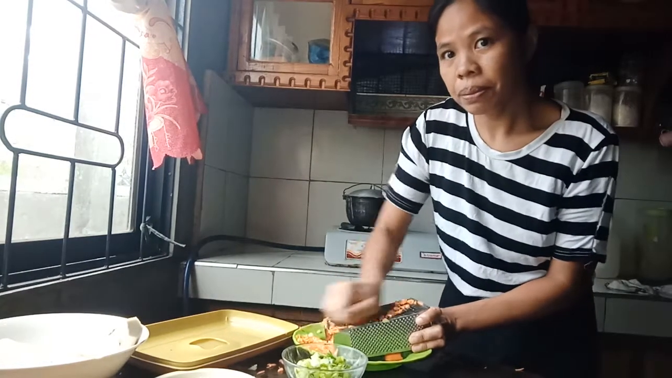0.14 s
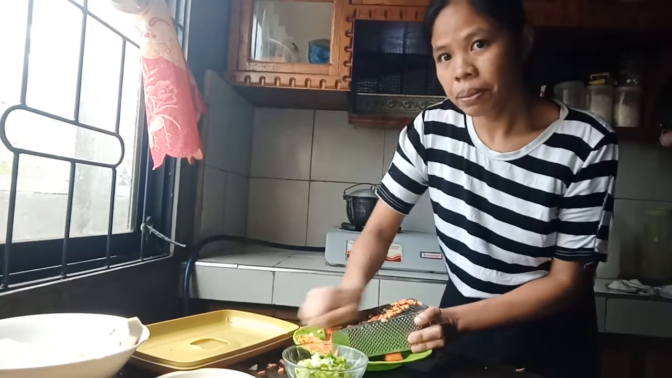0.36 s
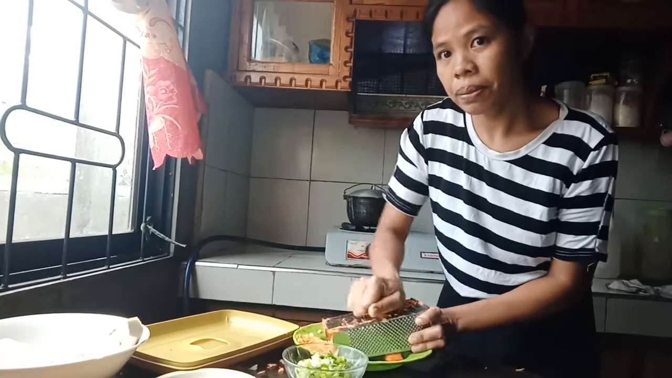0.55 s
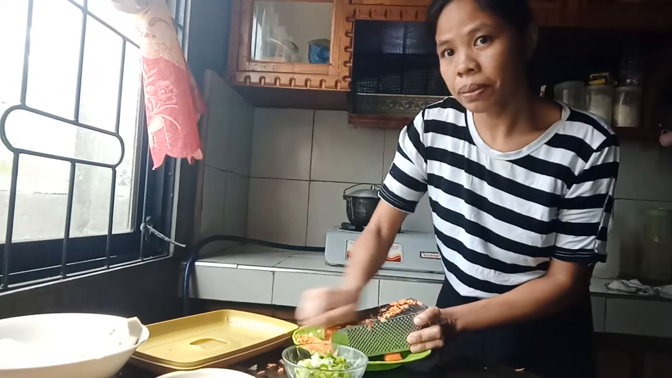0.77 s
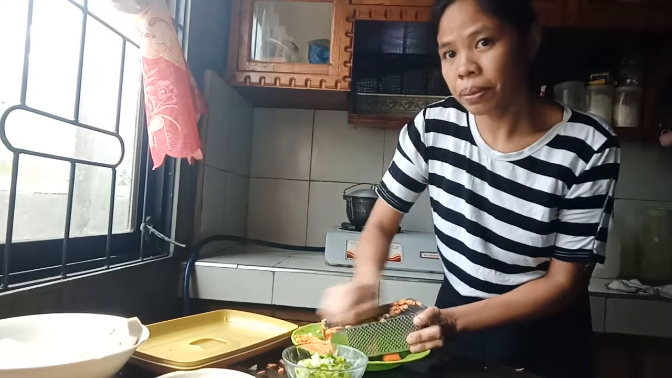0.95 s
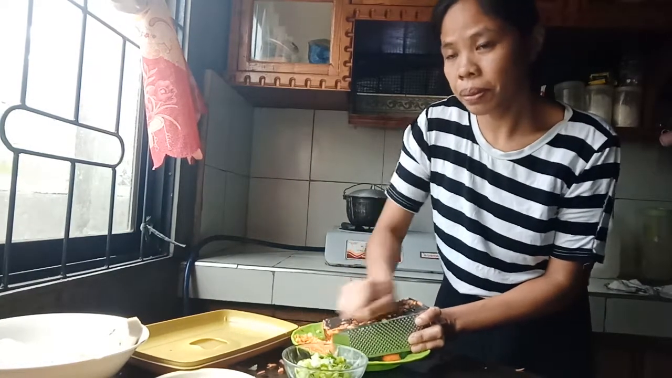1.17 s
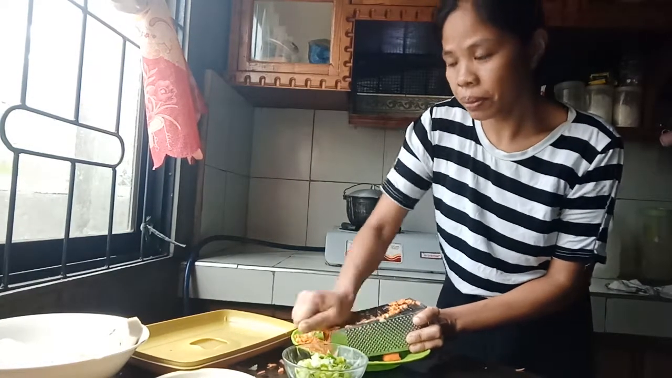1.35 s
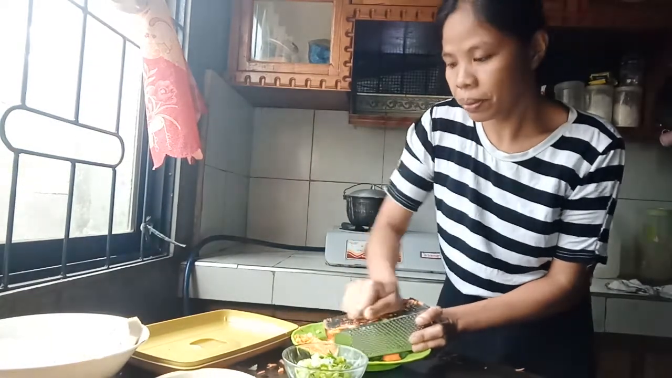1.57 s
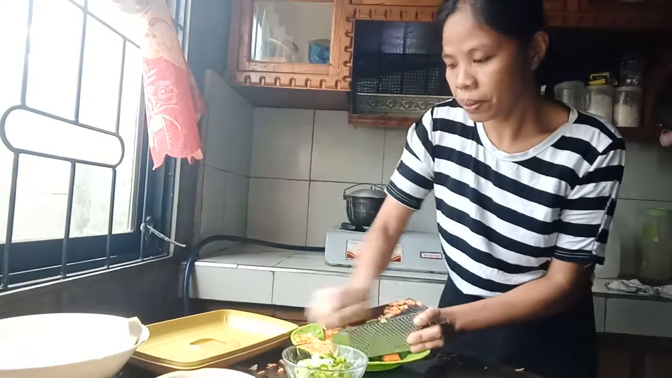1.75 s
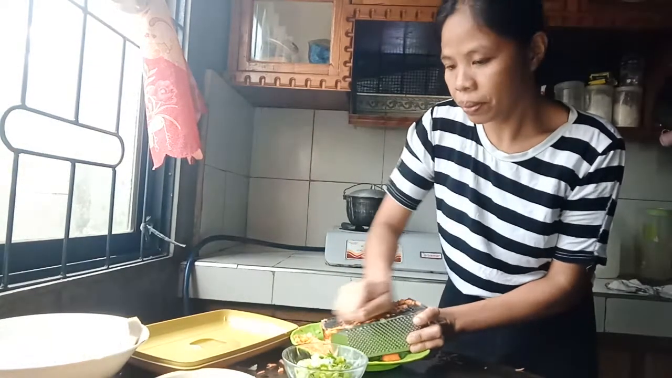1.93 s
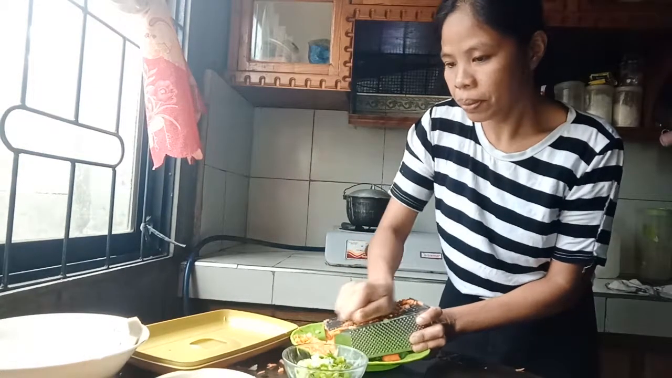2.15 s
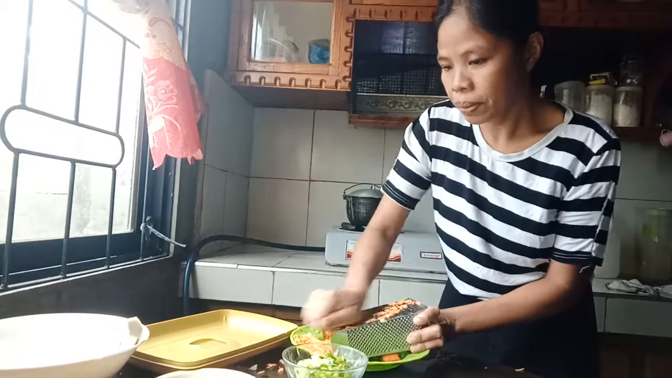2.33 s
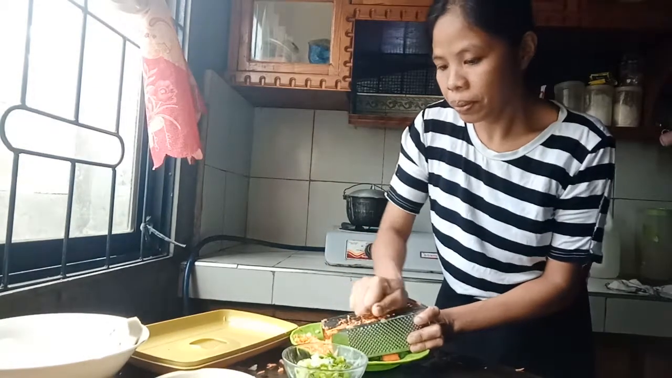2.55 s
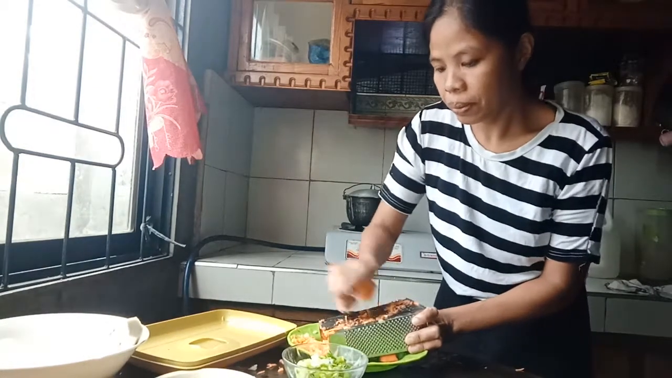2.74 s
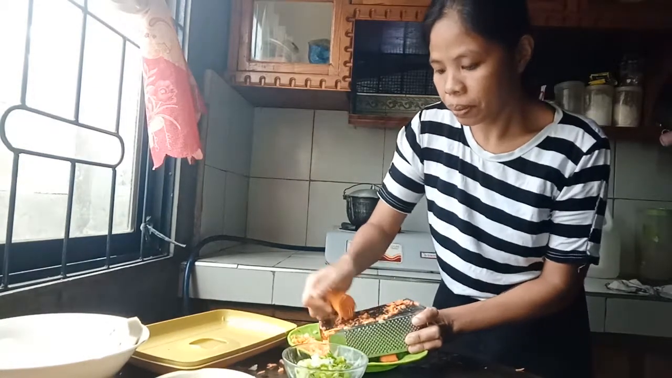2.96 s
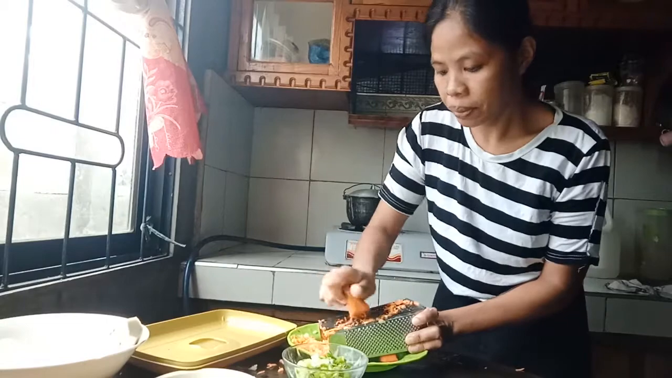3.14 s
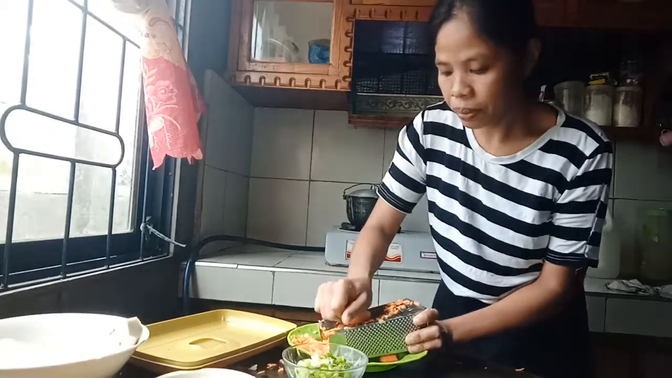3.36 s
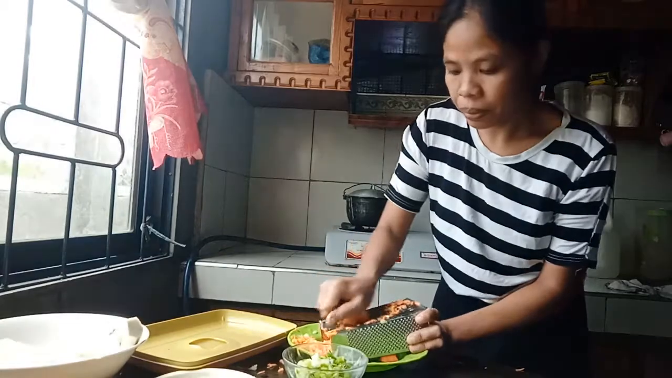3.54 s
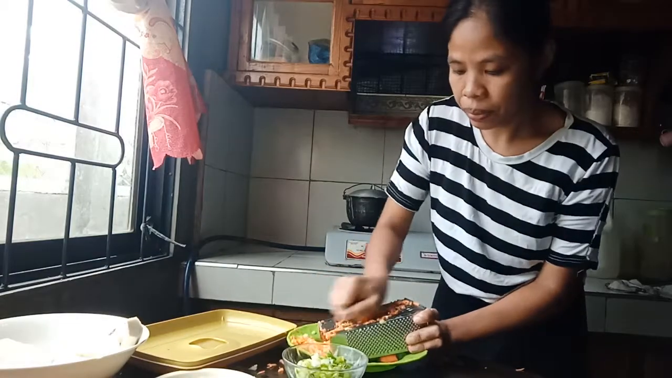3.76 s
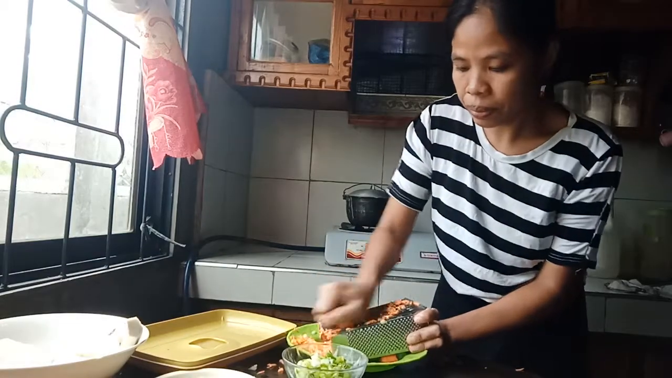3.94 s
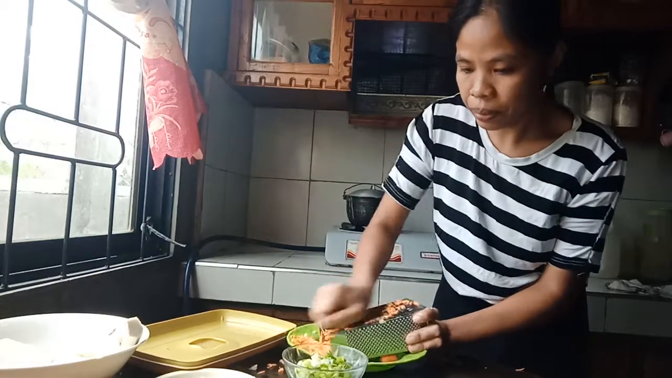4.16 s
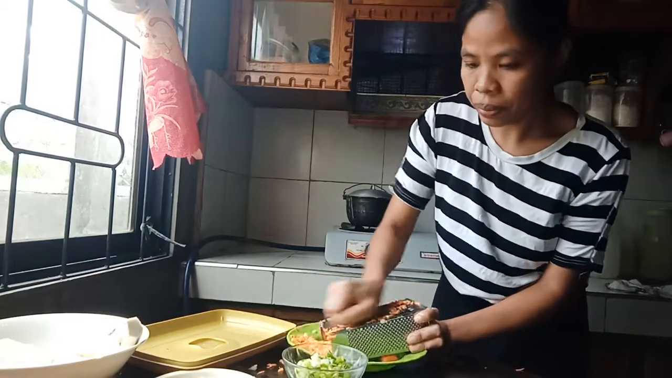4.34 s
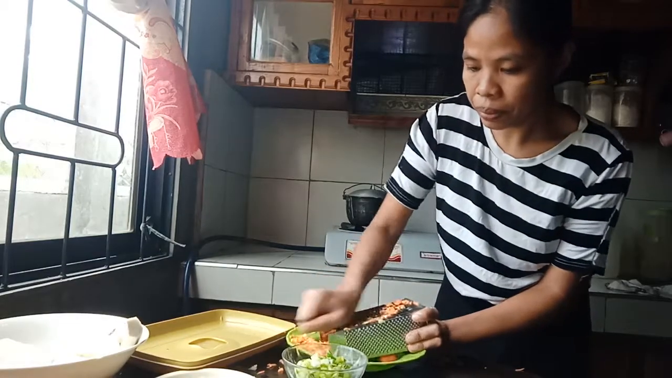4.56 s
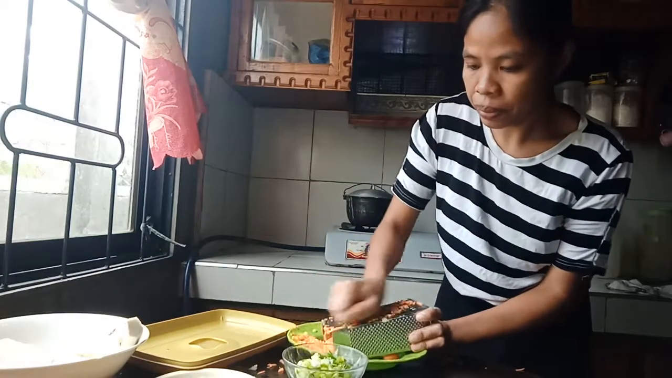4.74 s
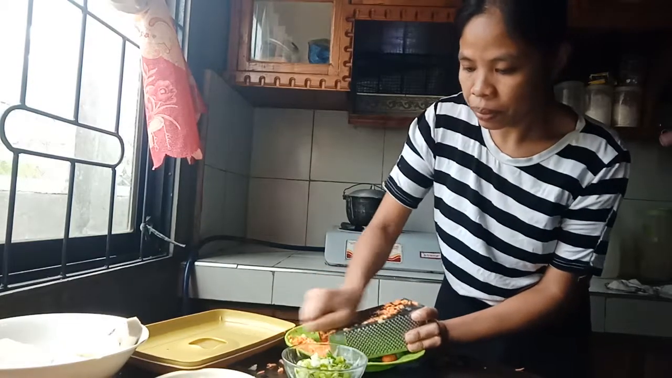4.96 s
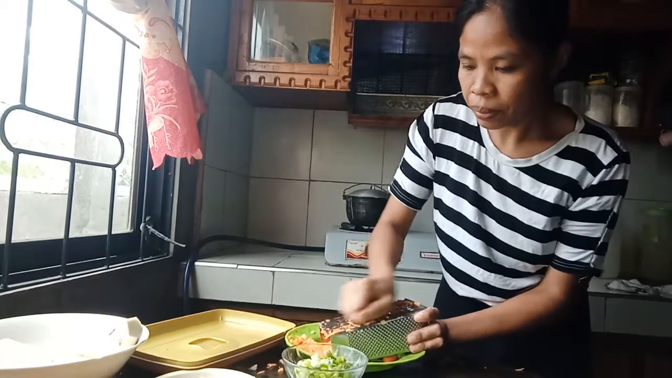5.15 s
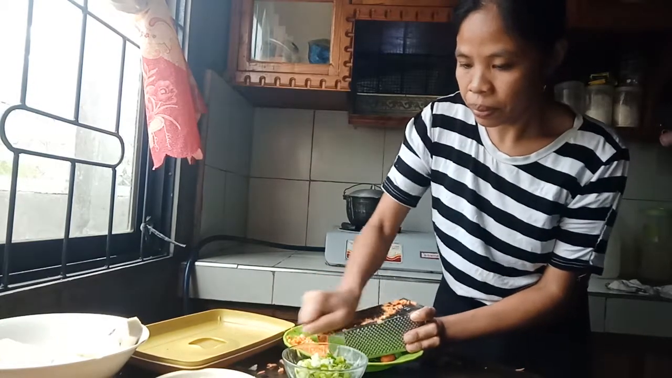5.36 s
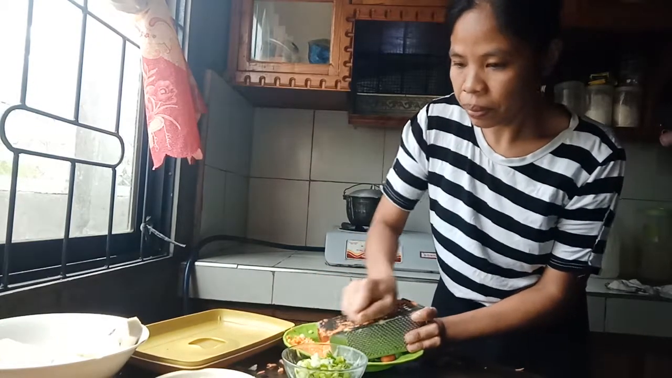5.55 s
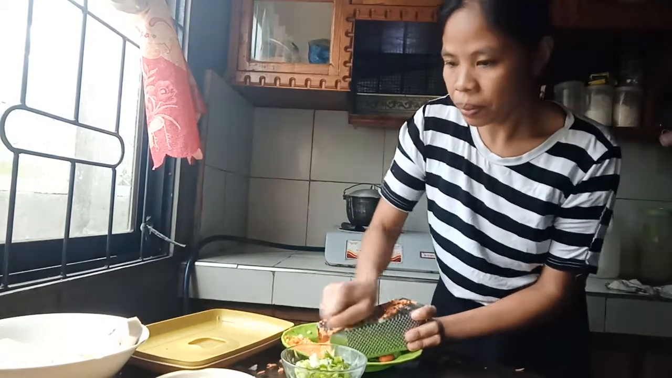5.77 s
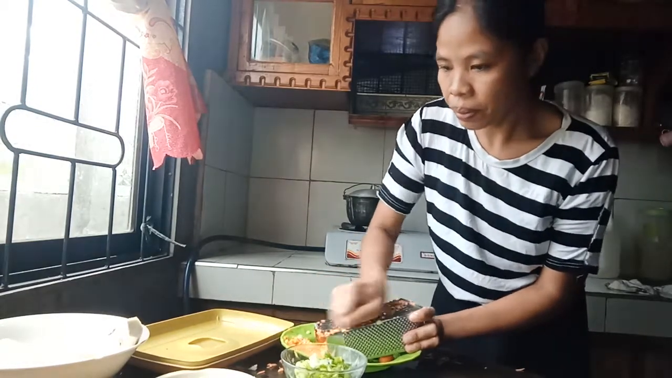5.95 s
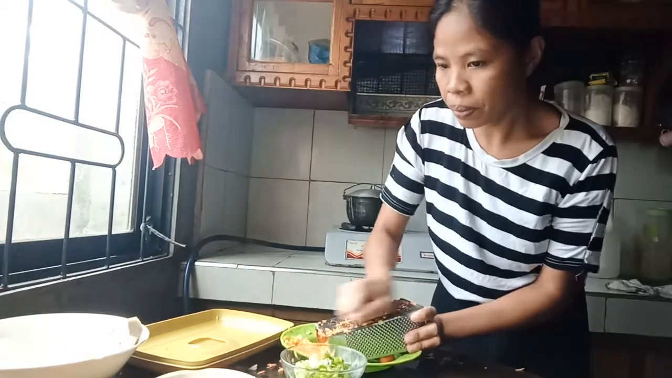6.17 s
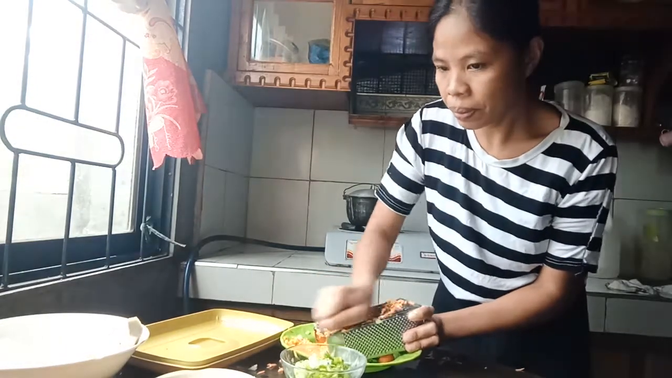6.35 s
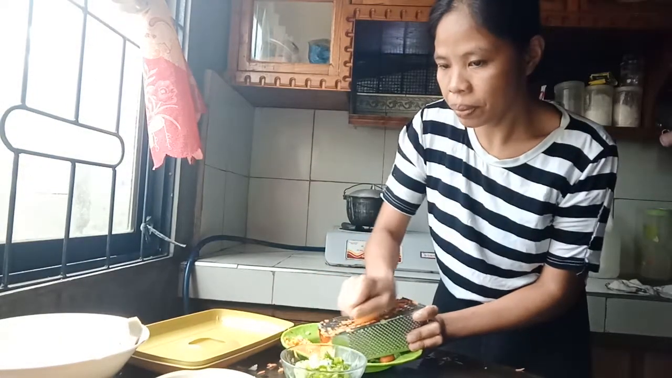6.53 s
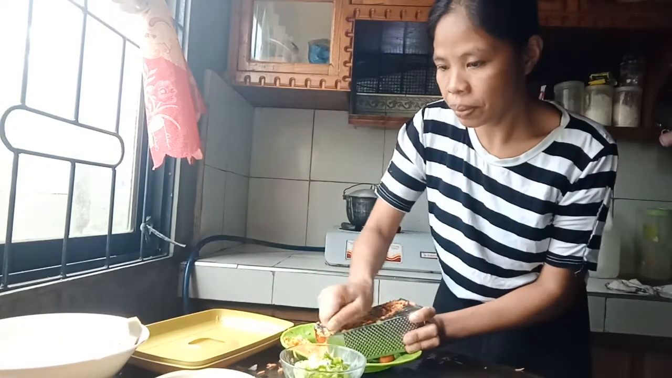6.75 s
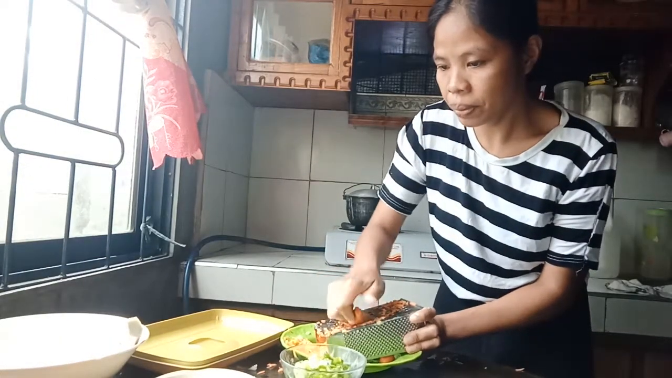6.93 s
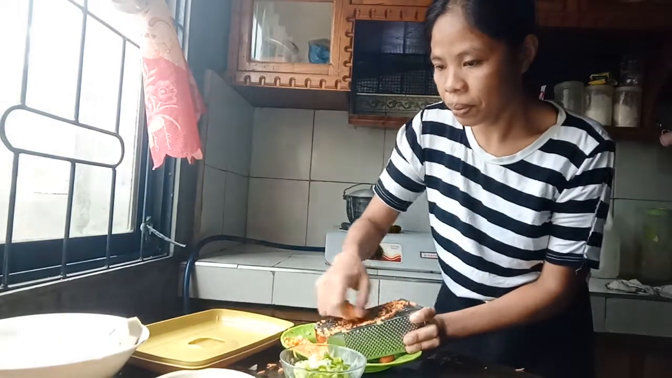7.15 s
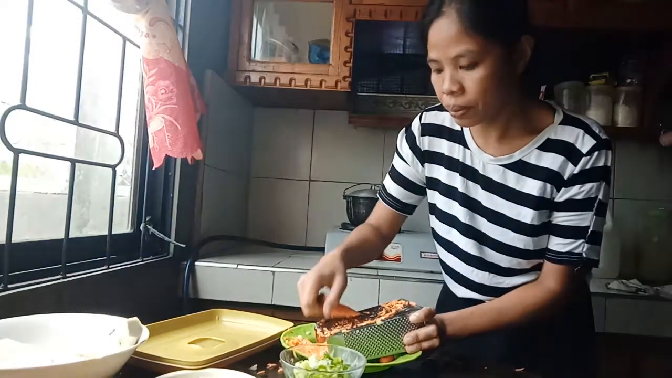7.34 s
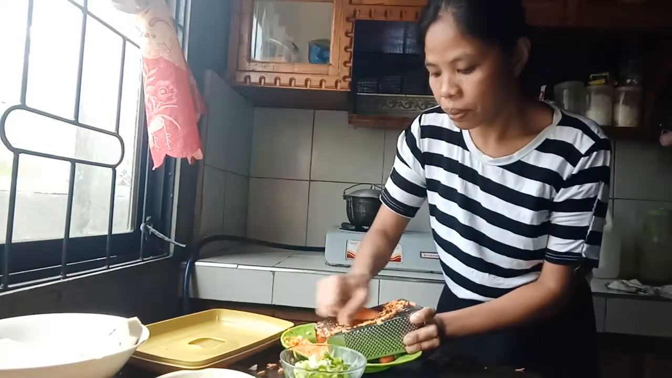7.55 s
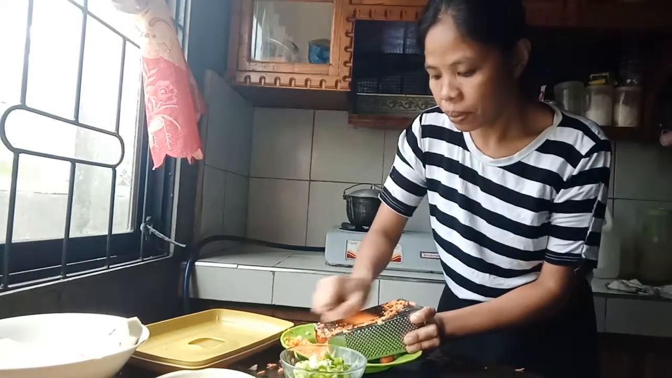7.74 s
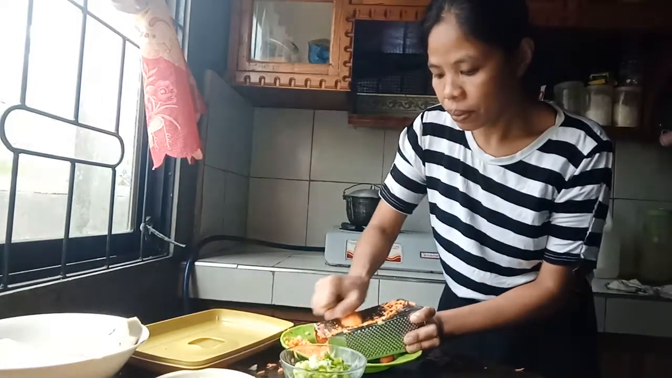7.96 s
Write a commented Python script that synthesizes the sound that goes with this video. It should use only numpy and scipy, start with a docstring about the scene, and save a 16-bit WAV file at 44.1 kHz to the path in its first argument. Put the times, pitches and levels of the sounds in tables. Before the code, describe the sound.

In a tiled kitchen with light reverberation, steel teeth rasp through a carrot in even, nearby strokes, with soft taps at some turns. The work breaks off for a moment, then goes on with sharp clacks of the grater against a ringing plate and one tiny wet squeak. After another pause come faint strokes and a brief scrape of the plate across the table. A cricket chirps very faintly far away.

```python
"""A carrot is grated by hand, to and fro, on a grater resting on a plate in a tiled kitchen.
The steel teeth snap off wet shreds, the carrot taps dully at some turns, and a cricket chirps far off.
After a pause for a new grip the strokes get harder: the grater knocks the plate into ringing,
and the wet carrot squeaks once. The work stops again, and as it resumes the plate sticks and slips,
juddering briefly across the table."""
import sys
import numpy as np
from scipy import signal
from scipy.fft import rfft, irfft
from scipy.io import wavfile
from scipy.ndimage import uniform_filter1d

SR = 44100
rng = np.random.default_rng(int(sys.argv[2]) if len(sys.argv) > 2 else 0)


def unload_wav(signal):
    """Save mono or channel-first audio to the path in sys.argv[1] as 16-bit WAV at rate SR, clipped to [-1, 1]."""
    wavfile.write(
        sys.argv[1],
        SR,
        np.round(np.clip(np.atleast_2d(signal).T, -1, 1) * 32767).astype(np.int16),
    )


N = 352800

# tone of a hard contact, for taps and knocks: f/Hz, level/dB
CONTACT_SPECTRUM = [(40, -32.5), (120, -13), (215, -2), (320, -4.5), (650, 0), (1000, 1), (1650, -0.5),
                    (2100, -1), (3100, -7.5), (4100, -7.5), (5300, -27), (6200, -20.5), (7500, -42),
                    (15500, -44.5)]


def from_db(db):
    """Decibels to gain."""
    return 10 ** (np.asarray(db) / 20)


def unit_rms(x):
    """Scale to unit power."""
    return x / np.sqrt(np.mean(x ** 2) + 1e-20)


def at_hz(points, hz):
    """Read a table on a log-frequency axis."""
    f, value = np.transpose(points)
    return np.interp(np.log(np.maximum(hz, 1)), np.log(f), value)


def add(out, s, sound):
    """Mix a sound in at time s."""
    at = round(s * SR)
    sound, at = sound[max(-at, 0):], max(at, 0)
    out[at:at + len(sound)] += sound[:N - at]


def colour(x, spectrum, size=4096):
    """Minimum-phase EQ with the given curve and unit power gain."""
    gain = from_db(at_hz(spectrum, np.arange(size // 2 + 1) * SR / size))
    cepstrum = irfft(np.log(gain))
    response = irfft(np.exp(rfft(2 * cepstrum[:size // 2], size)))
    return signal.fftconvolve(x, response / np.linalg.norm(response))[:len(x)]


def resonate(x, hz, width_hz):
    """Two-pole resonance with unity gain at its peak."""
    r = np.exp(-np.pi * width_hz / SR)
    feedback = [1, -2 * r * np.cos(2 * np.pi * hz / SR), r * r]
    return signal.lfilter(np.array([1, 0, -1]) * (1 - r * r) / 2, feedback, x + 1e-18)


def drift(rate):
    """Smooth random modulation of unit power, changing about rate times a second."""
    return unit_rms(np.interp(np.arange(N) * rate / SR, np.arange(N), rng.standard_normal(N)))


def room_tone(air_db=-61, drone_hz=121, drone_width_hz=9, drone_db=-67, swell_db=2):
    """Quiet room air with a low drone that swells and fades."""
    # tone of the air: f/Hz, level/dB
    air_spectrum = [(15, -83.5), (25, -40.5), (91, -15), (122, -1), (148, -18.5), (240, -18), (267, -20.5),
                    (421, -21), (495, -26), (1270, -29.5), (1530, -25.5), (1750, -35), (2360, -27),
                    (5580, -46), (15500, -52.5)]
    air = from_db(air_db) * colour(rng.standard_normal(N), air_spectrum)
    drone = resonate(rng.standard_normal(N), drone_hz, drone_width_hz)
    drone = unit_rms(resonate(drone, drone_hz, 2 * drone_width_hz))
    return air + from_db(drone_db + swell_db * drift(2.9)) * drone


def strokes():
    """The hand swings evenly, a push and a return each cycle; yields start/s, length/s, level/dB."""
    # runs of strokes: start/s, stop/s, cycle/s, push length/s,
    # return offset/s, return length/s, return against push/dB
    runs = [(-.219, 2.5, 0.33, .16, 0.19, .11, -5.5), (3.161, 4.93, .376, 0.14, .195, 0.12, 4.5),
            (5.024, 6.72, 0.3525, 0.21, .225, .085, -2), (7.541, 7.74, 0.38, 0.11, 0.16, 0.16, -1.5)]
    # how hard the carrot is pressed on the teeth: t/s, relative level/dB
    pressure = [(0, -29.5), (.18, -35.5), (.5, -33), (.85, -34), (1.3, -35.5), (2.5, -36), (3.25, -68.5),
                (3.42, -66.5), (3.62, -39), (4.1, -34), (4.95, -32.5), (5.4, -36.5), (5.85, -33.5),
                (6.2, -38), (6.53, -41.5), (6.7, -49.5), (7.58, -57), (7.78, -45.5)]
    for first, stop, cycle, push_s, turn_s, return_s, return_db in runs:
        for push in np.arange(first, stop, cycle):
            for start, length, lift_db in ((push, push_s, 0), (push + turn_s, return_s, return_db)):
                if start < min(stop, N / SR):
                    yield start, length, lift_db + np.interp(start + length / 2, *np.transpose(pressure))


def grating(snaps_per_s=4500, spread_db=2.5, chatter_db=1.24, rows_per_s=220, juice_db=-6,
            sheet_db=-1, sheet_width_hz=130, sheet_shift_db=4, sheet_parts=9, skew=.85):
    """Teeth tear off shreds in tiny snaps, more of them the faster the carrot moves, over a wet hiss."""
    # tone of the rasp: f/Hz, level/dB
    rasp_spectrum = [(30, -44.5), (60, -13.5), (200, -4), (330, -6), (430, -2), (640, 0), (950, -2),
                     (1250, -1), (1900, -6), (2600, -2), (4450, -9), (5260, -22), (6230, -19),
                     (9800, -39.5), (15500, -37.5)]
    speed, force = np.zeros(N), np.zeros(N)
    for start, length, level_db in strokes():
        travel = np.linspace(0, 1, int(length * SR)) ** skew  # full speed early, then a slow ease-off
        arc = np.sin(np.pi * travel).clip(0) ** 1.1
        add(speed, start, arc)
        add(force, start, from_db(level_db) * np.sqrt(arc))
    chance = snaps_per_s / SR
    sizes = from_db(spread_db * np.minimum(rng.exponential(1, N), 4))
    sizes = unit_rms(sizes * rng.choice([-1, 1], N))
    snaps = sizes * (rng.random(N) < chance * speed) / np.sqrt(chance)
    juice = from_db(juice_db) * np.sqrt(speed) * rng.standard_normal(N)
    catching = from_db(chatter_db * drift(rows_per_s))  # rows of teeth catch and let go
    # each snap plucks one part of the steel sheet; which parts speak shifts as the carrot travels
    part = rng.integers(0, sheet_parts, N)
    sheet = np.zeros(N)
    for k, hz in enumerate(np.geomspace(2250, 4250, sheet_parts)):
        ring = resonate(snaps * (part == k), hz, sheet_width_hz)
        sheet += ring * from_db(sheet_db + sheet_shift_db * drift(17))
    return colour((snaps + juice + sheet) * force * catching, rasp_spectrum)


def carrot_taps(ring_t60=.023, grit_t60=0.05, grit_db=-10, soft_hz=2400):
    """Set down at a turn, the carrot bumps one well-damped resonance, with a little contact grit."""
    # light, dull taps: t/s, level/dB, f/Hz
    taps = [(.030, -25.5, 620), (0.269, -25, 1273), (0.383, -20, 660), (0.466, -29.5, 1300),
            (1.006, -23.5, 645.7), (1.528, -30, 729.2), (1.604, -29.5, 1350), (1.917, -27.5, 672.8),
            (2.263, -26, 815), (3.699, -25.5, 900), (6.31, -32, 970), (6.750, -25, 890)]
    t, out = np.arange(SR // 10) / SR, np.zeros(N)
    for s, level_db, hz in taps:
        bump = np.sin(2 * np.pi * hz * t) * from_db(-60 * t / ring_t60)
        grit = rng.standard_normal(len(t)) * from_db(grit_db - 60 * t / grit_t60)
        add(out, s, from_db(level_db) * (bump + colour(grit, CONTACT_SPECTRUM)))
    return signal.lfilter(*signal.butter(2, soft_hz, fs=SR), out)


def cricket(first_s=0.05, period_s=0.1326, jitter_s=0.0044, spacing_s=.018, syllable_s=.013,
            start_hz=6950, end_hz=6480, level_db=-76):
    """A far cricket: two wing strokes a chirp, each a short falling whistle."""
    out, size = np.zeros(N), int(syllable_s * SR)
    glide_hz = np.linspace(start_hz, end_hz, size)
    syllable = np.hanning(size) * np.sin(2 * np.pi * np.cumsum(glide_hz) / SR)
    for k, (late, loud) in enumerate(rng.standard_normal((int(N / SR / period_s), 2))):
        onset = first_s + k * period_s + jitter_s * late
        for stroke in range(2):
            add(out, onset + stroke * spacing_s, from_db(level_db + 2 * loud) * syllable)
    return out


def grater_knocks(ring_db=-1, focus_db_per_octave=7, rise_share=.16, shiver=0.025, ring_send_db=-2.5,
                  strike_db=-10, soft_hz=5600, strike_hz=3800):
    """The grater lands in a short rattle that rings the plate; returns direct sound and reverb send."""
    # grater on plate: t/s, level/dB, rattle length/s, ring/dB, ring focus/Hz, reverb send/dB
    knocks = [(3.511, -40, 0.021, -17, 2400, -5), (3.733, -9, 0.014, 3.5, 950, .5),
              (4.033, -24.5, .009, -12.5, 787, -1), (4.060, -13.5, 0.0071, -15, 1400, -11),
              (4.093, -7, .011, 4, 834, 1), (4.460, -8.5, 0.019, 7.5, 780, 0),
              (4.872, -11, .019, 6.5, 788.2, -0.5), (5.113, -21.5, 0.0072, 8, 1690, -2),
              (5.213, -17, 0.013, 5.5, 803, -6.5), (5.278, -26, .01, 1.5, 3400, -5.5),
              (5.412, -26, .007, -19.5, 2400, 2), (5.548, -8, 0.016, -2, 1200, -0.5),
              (5.609, -9, .0066, -2.5, 1397, -18), (5.892, -10, 0.0082, -3, 2060, -1.5),
              (6.157, -27, 0.0064, 0, 1850, 0), (6.560, -25, 0.0071, 0, 1660, -2),
              (7.842, -40, 0.0065, -16, 2400, -2.5)]
    # damped modes of plate and grater: f/Hz, level/dB, t60/s
    plate_modes = [(620, -13, 0.032), (785.6, 4, 0.06), (817.2, 1.5, 0.069), (879, -1.5, 0.1),
                   (1356, -11, 0.054), (1393, -6, .05), (1648, -2.5, 0.14), (1734, -1.5, .07),
                   (1870, -3, 0.043), (2046, -5, 0.053), (2400, -12, 0.071), (3290, -6.5, 0.19),
                   (4200, -15.5, 0.032)]
    t = np.arange(SR // 2) / SR
    direct, send = np.zeros(N), np.zeros(N)
    hz, mode_db, t60 = np.transpose(plate_modes)
    modes = np.sin(2 * np.pi * np.outer(hz, t)) * from_db(-60 * t / t60[:, None])
    soft = signal.butter(1, soft_hz, fs=SR)  # the soft contact loses treble
    blunt = signal.butter(2, strike_hz, fs=SR)  # the main strike is duller still
    for s, level_db, length, plate_db, focus_hz, send_db in knocks:
        rise_s = rise_share * length
        # the rattle stops abruptly when the grater seats, leaving a faint shiver
        decay = np.exp(-(t / length) ** 2) + shiver * np.exp(-t / (2 * length))
        contact = (1 - np.exp(-t / rise_s)) * decay
        rattle = colour(contact * rng.choice([-1, 1], len(t)), CONTACT_SPECTRUM)
        clap = colour((t == 0) * np.linalg.norm(contact), CONTACT_SPECTRUM)  # its energy as one blow
        # the spot that is struck favours some modes
        favour_db = rng.standard_normal(len(hz)) - focus_db_per_octave * np.abs(np.log2(hz / focus_hz))
        mode_gains = from_db(ring_db + plate_db + mode_db + favour_db)
        ring = mode_gains @ modes * (1 - np.exp(-t / (2 * rise_s)))
        rattle, clap, ring = from_db(level_db) * signal.lfilter(*soft, [rattle, clap, ring])
        add(direct, s, rattle + ring)
        add(direct, s + rise_s, from_db(strike_db) * signal.lfilter(*blunt, clap))  # the hardest contact
        add(send, s, from_db(send_db) * (clap + from_db(ring_send_db) * ring))
    return direct, send


def carrot_squeak(start_s=3.665, length_s=.035, hz=2830, level_db=-39.5, waver=.008):
    """Wet carrot sticks and slips on the steel: one short whistle with an unsteady pitch."""
    out, size = np.zeros(N), int(length_s * SR)
    cycles = np.cumsum(hz * (1 + waver * drift(200)[:size])) / SR
    add(out, start_s, from_db(level_db) * np.hanning(size) * np.sin(2 * np.pi * cycles))
    return out


def plate_drag(start_s=7.853, attack_s=.02, level_db=-36.5, slip_hz=124, unevenness=0.066,
               friction=0.05, grind_db=-11, flutter_db=3, judder_band_hz=(85, 1200)):
    """The plate sticks and slips; every slip shakes the table top while the foot grinds."""
    # resonances of the table top: f/Hz, width/Hz, level/dB
    table_modes = [(121, 23, 3.5), (408, 30, -8.5), (450, 16, -3.5), (809, 120, -33)]
    # tone of the grinding foot: f/Hz, level/dB
    grind_spectrum = [(350, -31), (600, 2), (852, -2), (1760, -18), (2600, 2), (2900, -3.5), (4520, -14.5),
                      (5320, -27), (15000, -56)]
    cycles = np.cumsum(slip_hz * (1 + unevenness * drift(90))) / SR
    slips = np.diff(np.floor(cycles), prepend=0) + friction * rng.standard_normal(N)
    judder = sum(from_db(db) * resonate(slips, hz, width) for hz, width, db in table_modes)
    band = signal.butter(2, judder_band_hz, "band", fs=SR, output="sos")
    judder = unit_rms(signal.sosfilt(band, judder))
    grind = from_db(grind_db + flutter_db * drift(60)) * colour(rng.standard_normal(N), grind_spectrum)
    fade_in = np.clip((np.arange(N) / SR - start_s) / attack_s, 0, 1)
    return (judder + grind) * from_db(level_db) * fade_in


def kitchen_reverb(x, build_s=0.015, bands=12):
    """Dense reflections from the tiles build up quickly and die band by band."""
    # decay of the kitchen: f/Hz, t60/s
    decay_times = [(100, 0.65), (280, 0.47), (800, 0.57), (2000, 0.57), (4500, 0.43), (9000, 0.35),
                   (15000, 0.59)]
    t, tail = np.arange(SR) / SR, np.zeros(SR)
    white, hz = rfft(rng.standard_normal(SR)), np.arange(SR // 2 + 1)
    edges = np.geomspace(40, SR / 2, bands + 1)
    for low, high in zip(edges, edges[1:]):
        band = irfft(white * (hz >= low) * (hz < high))
        tail += band * from_db(-60 * t / at_hz(decay_times, np.sqrt(low * high)))
    tail *= 1 - np.exp(-t / build_s)
    return signal.fftconvolve(x, tail / np.linalg.norm(tail))[:N]


def scene(rasp_db=-2, rasp_send_db=-6, knock_send_db=1.5, tap_send_db=-13, cricket_send_db=-4):
    """Mono mix of the work at the table and the cricket, with kitchen reverb and room tone."""
    rasp = from_db(rasp_db) * grating() + carrot_squeak()
    tapping, chirps = carrot_taps(), cricket()
    knocking, knock_send = grater_knocks()
    reverb = kitchen_reverb(from_db(rasp_send_db) * rasp + from_db(knock_send_db) * knock_send
                            + from_db(tap_send_db) * tapping + from_db(cricket_send_db) * chirps)
    return (rasp + tapping + knocking + plate_drag() + chirps + reverb + room_tone())[None]


def record(dry, threshold_db=-15, release_db_per_s=90, attack_s=0.035, ceiling=0.84,
           low_cut_hz=45, high_cut_hz=15700):
    """Gain control ducks after the hardest knocks, peaks clip softly, bass and top are cut."""
    power = np.abs(uniform_filter1d(dry[0] ** 2, size=128)) + 1e-12
    excess_db = np.maximum(10 * np.log10(power) - threshold_db, 0)
    ramp = release_db_per_s * np.arange(N) / SR
    duck_db = np.maximum.accumulate(excess_db + ramp) - ramp  # catch each peak, then release steadily
    pole = np.exp(-1 / (attack_s * SR))
    ducked = dry * from_db(-signal.lfilter([1 - pole], [1, -pole], duck_db))
    clipped = ducked / (1 + (ducked / ceiling) ** 4) ** .25
    thinned = signal.lfilter(*signal.butter(2, low_cut_hz, "high", fs=SR), clipped)
    return signal.sosfilt(signal.ellip(10, .1, 80, high_cut_hz, fs=SR, output="sos"), thinned)


dry = scene()
out = record(dry)
unload_wav(out)
```